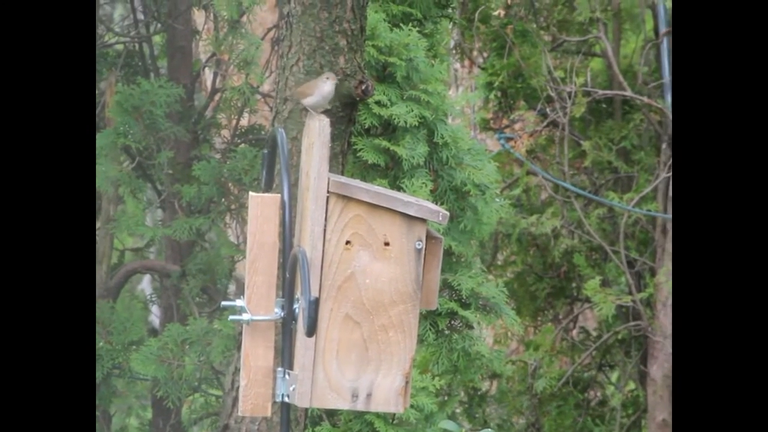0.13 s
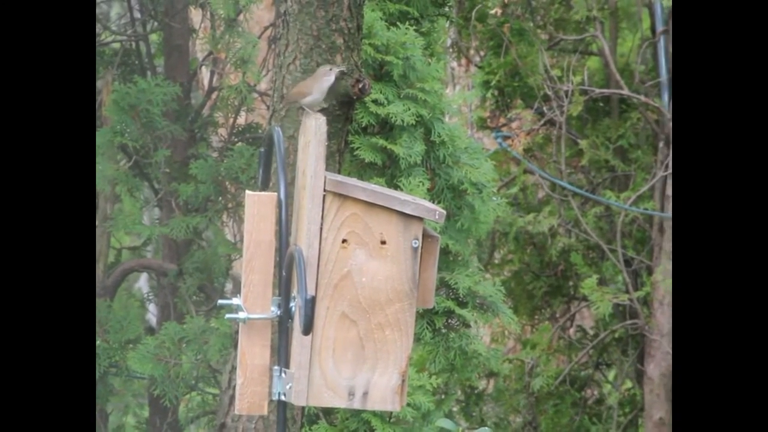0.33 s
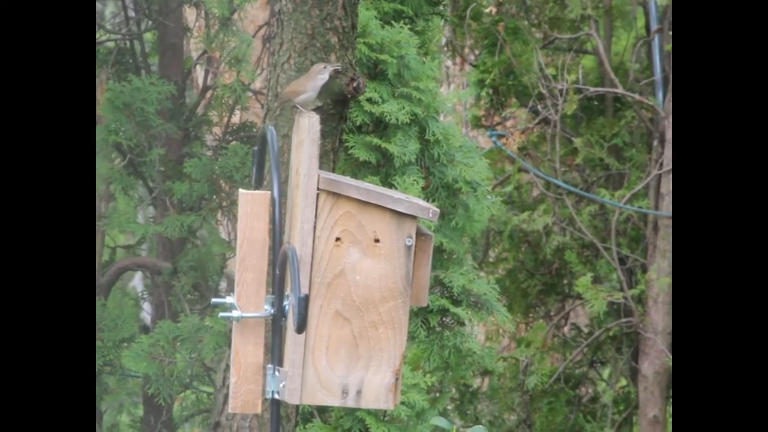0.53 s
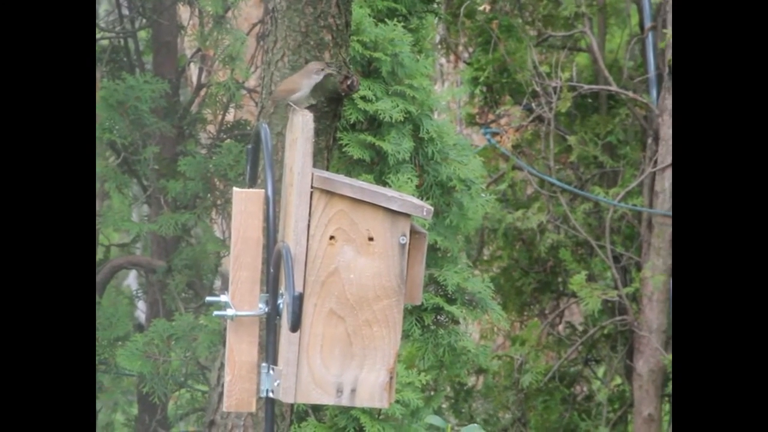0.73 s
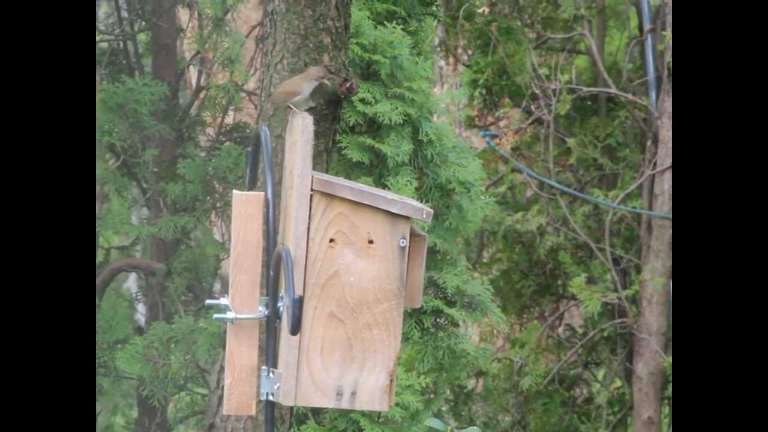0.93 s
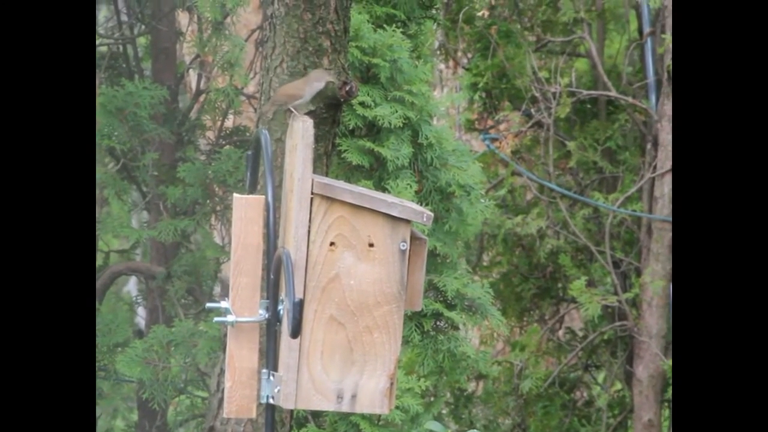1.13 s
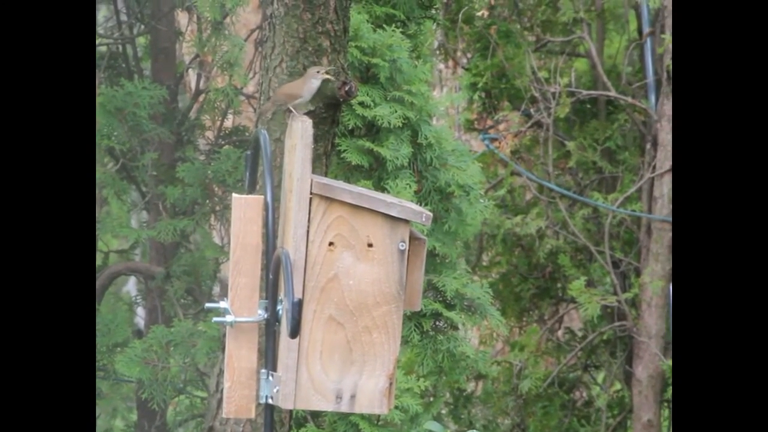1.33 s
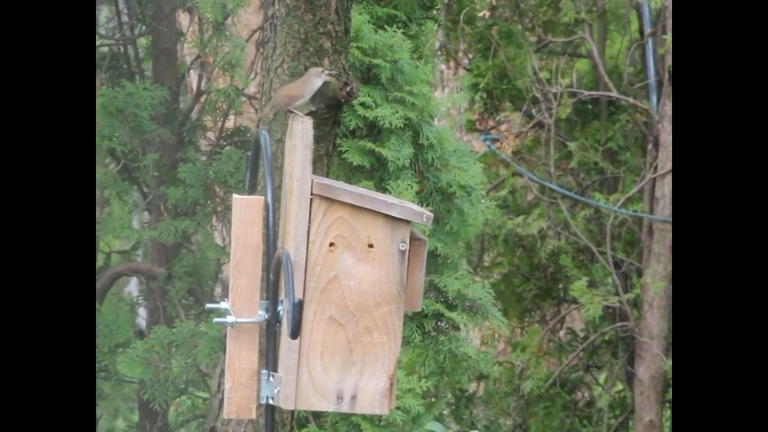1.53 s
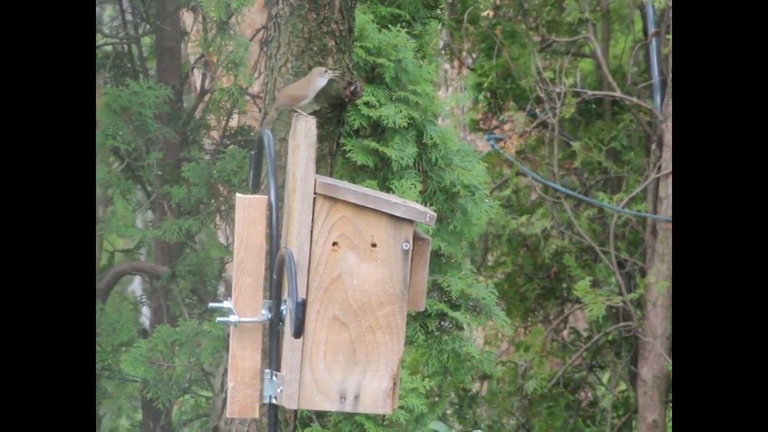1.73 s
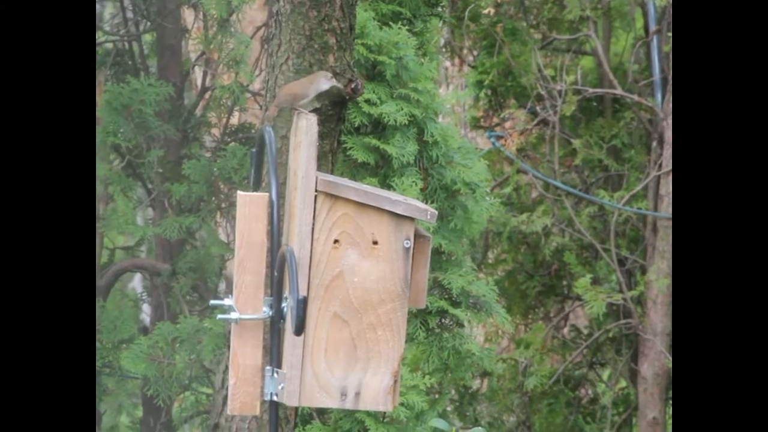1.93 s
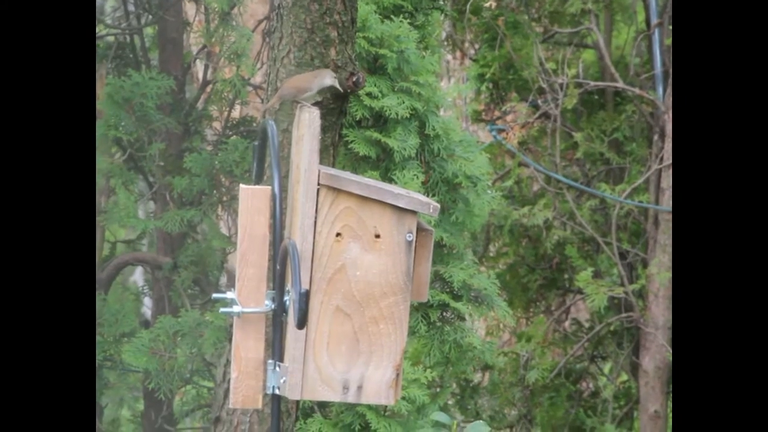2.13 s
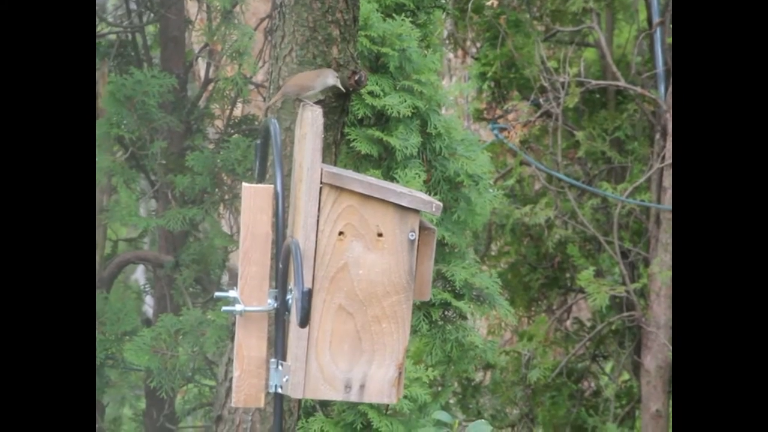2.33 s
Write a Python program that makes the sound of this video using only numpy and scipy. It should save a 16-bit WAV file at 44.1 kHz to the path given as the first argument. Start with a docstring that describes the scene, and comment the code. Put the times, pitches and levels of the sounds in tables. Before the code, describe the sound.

A wren sings one rapid song in a backyard, with a short echo. Soft scratchy chatter runs for the first 0.7 seconds, followed by four high gliding whistles until 1.3. A louder trill of four quick notes follows, then from 1.8 to 2.2 seconds three falling sweeps alternate with soft lower notes. A steady low hum and faint hiss lie underneath, with a slight rumble near 1.3 seconds.

```python
"""A wren sings one song in a backyard: scratchy chatter, high whistles, a trill of arches, then three
falling slurs between soft low notes. Each note is one gliding tone, roughened by flutter in the chatter.
Nearby walls throw the song back strongly and the trees add a diffuse tail.
Under it lie a steady outdoor hum and hiss, one brief low rumble and a faint electronic whine."""
import sys
import numpy as np
from scipy import signal
from scipy.fft import rfft, irfft
from scipy.io import wavfile
from scipy.ndimage import uniform_filter1d

SR = 44100
rng = np.random.default_rng(int(sys.argv[2]) if len(sys.argv) > 2 else 0)


def wrap_up_sound(samples):
    """Save the sound to the file named by the first command line argument, as 16-bit audio."""
    columns = np.atleast_2d(samples).T
    # keep every value between -1 and 1, then stretch to whole-number steps
    tamed = np.clip(columns, -1, 1)
    steps = np.round(tamed * 32767).astype(np.int16)
    wavfile.write(sys.argv[1], SR, steps)


N = 110250


def amp(db):
    """Decibels to gain."""
    return 10 ** (np.asarray(db) / 20)


def unit(x):
    """Scales to rms 1."""
    return x / np.sqrt(np.mean(x ** 2) + 1e-20)


def add(mix, start_s, sound):
    """Mixes a sound in at start_s."""
    part = mix[max(round(start_s * SR), 0):][:len(sound)]
    part += sound[:len(part)]


def phase_of(hz):
    """Integrates frequency to phase [rad]."""
    return 2 * np.pi * np.cumsum(hz) / SR


def noise(spectrum):
    """Noise of rms 1 with the given spectrum, rolled off at both ends."""
    knots_hz, db = np.transpose(spectrum)
    hz = np.fft.rfftfreq(N, 1 / SR) + 1
    gain = amp(np.interp(np.log(hz), np.log(knots_hz), db))
    rolloff = (1 + (hz / knots_hz[-1]) ** 20) * (1 + (knots_hz[0] / hz) ** 2)
    return unit(irfft(rfft(rng.standard_normal(N)) * gain / rolloff, N))


def wobble(rate_hz, n):
    """n samples of random wavering, rms about 1, low-passed at rate_hz."""
    hz = np.fft.rfftfreq(N, 1 / SR)
    return unit(irfft(rfft(rng.standard_normal(N)) * np.exp(-(hz / rate_hz) ** 2), N))[:n]


# hum spectrum (frequency [Hz], relative density [dB])
HUM_SPECTRUM = [(25, -1), (40, -11.5), (60, 0), (100, -3), (170, -1), (250, -3.5), (420, -7.5),
                (870, -14.5), (1250, -19), (1700, -26), (2200, -27)]
# hiss spectrum (frequency [Hz], relative density [dB])
HISS_SPECTRUM = [(800, -43), (1700, -7), (3500, 8), (5500, -5), (8000, -15.5), (12000, -15.5), (15700, -15)]


def outdoor_air(hum_db=-41, hiss_db=-54):
    """Steady low hum and faint hiss: two bands of noise."""
    return amp(hum_db) * noise(HUM_SPECTRUM) + amp(hiss_db) * noise(HISS_SPECTRUM)


# whine tones (frequency [Hz], rms level [dB])
WHINE_TONES = [(14874, -71), (15714, -76)]


def whine():
    """Thin electronic whine: two steady sines."""
    t = np.arange(N) / SR
    return sum(np.sqrt(2) * amp(db) * np.sin(2 * np.pi * hz * t) for hz, db in WHINE_TONES)


# scratchy notes (start [s], length [s], pitch [Hz], level [dB], relative overtone and hiss level [dB])
CHATTER_NOTES = [(.018, 0.028, 4030, -51, -34), (0.071, 0.024, 3750, -46.5, -31),
                 (0.118, .026, 3150, -47.5, 7), (0.201, 0.029, 3124, -47.5, 9),
                 (.262, 0.025, 3134, -39, -26), (0.362, 0.029, 3170, -46.5, 8.5),
                 (0.426, .022, 3080, -35.5, -34), (0.513, 0.066, 3260, -38, -36),
                 (.649, 0.0152, 3162, -34.5, -31), (0.702, 0.014, 3120, -33, -34)]
# hiss in those notes (frequency [Hz], relative density [dB])
SCRATCH_SPECTRUM = [(1500, -34), (2600, -25), (4400, -0.5), (5250, -11), (6150, 1.5), (7500, -2),
                    (8600, -17.5), (10000, -28), (11500, -44)]
WAVER_DEPTH, WAVER_RATE_HZ = 0.03, 298
FLUTTER_HZ, FLUTTER_RAD, FLUTTER_JITTER = 557, 0.78, 0.16
RASP_SPREAD, RASP_RATE_HZ = 0.079, 810


def chatter(fall=0.052):
    """Harsh, slightly falling notes: flutter adds side tones, jitter rasps; the bright ones also hiss."""
    out = np.zeros(N)
    for start_s, length_s, hz, db, overtone_db in CHATTER_NOTES:
        progress = np.arange(0, 1, 1 / (length_s * SR))
        n = len(progress)
        pitch_hz = hz * (1 + fall * (1 - 2 * progress))
        core_rad = phase_of(pitch_hz * (1 + WAVER_DEPTH * wobble(WAVER_RATE_HZ, n)))
        flutter = np.sin(phase_of(FLUTTER_HZ * (1 + FLUTTER_JITTER * wobble(WAVER_RATE_HZ, n))))
        rasp_rad = phase_of(hz * RASP_SPREAD * wobble(RASP_RATE_HZ, n))
        rough_rad = core_rad + FLUTTER_RAD * flutter + rasp_rad
        voice = np.sin(rough_rad) + 0.5 * np.sin(core_rad)
        overtones = amp(1) * np.sin(2 * core_rad) + amp(-23) * np.sin(rough_rad + 2 * core_rad)
        hiss = amp(-3) * noise(SCRATCH_SPECTRUM)[:n]
        envelope = amp(db) * np.sqrt(np.sin(np.pi * progress))
        add(out, start_s, envelope * (voice + amp(overtone_db) * (overtones + hiss)))
    return out


def scatter(envelope):
    """Dense random reflections under an envelope, energy 1."""
    return unit(rng.standard_normal(len(envelope)) * envelope) / np.sqrt(len(envelope))


# reflections from rough walls (delay [s], level [dB])
WALL_ECHOES = [(.0030, -11.5), (.0160, -5), (0.025, -11.5), (0.041, -7)]
EARLY_DB, EARLY_T60_S, EARLY_BUILD_S = -0.5, 0.28, 0.005
TAIL_DB, TAIL_T60_S, TAIL_BUILD_S = -4.5, 0.54, 0.018


def yard(song, direct_db=-8, smear_s=0.0012):
    """Direct sound, quick scatter from nearby things, a longer tail from trees, smeared wall echoes."""
    t = np.arange(SR) / SR
    impulse = signal.unit_impulse(SR)
    response = amp(direct_db) * impulse
    for db, t60_s, build_s in ((EARLY_DB, EARLY_T60_S, EARLY_BUILD_S),
                               (TAIL_DB, TAIL_T60_S, TAIL_BUILD_S)):
        build = 1 - np.exp(-(t / build_s) ** 2)
        decay = amp(-60 * t / t60_s)
        response += amp(db) * scatter(build * decay)
    for delay_s, db in WALL_ECHOES:
        add(response, delay_s, amp(db) * (impulse + 0.5 * scatter(np.exp(-t / smear_s))))
    return signal.fftconvolve(song, response)[:N]


def glide(times_s, hz, db, waver, edge_s=0.0034, second_db=-46, third_db=-48):
    """Wavering tone with faint harmonics along a pitch and level curve; returns (start_s, sound)."""
    t = np.arange(times_s[0], max(times_s[-1], times_s[0] + 0.01), 1 / SR)
    depth = np.interp(t, times_s, waver * np.ones(len(times_s)))
    smooth_hz = uniform_filter1d(np.interp(t, times_s, hz), size=130)
    jitter = np.sqrt(2) * np.tanh(wobble(WAVER_RATE_HZ, len(t)))
    phase = phase_of(smooth_hz * (1 + depth * jitter))
    tone = np.sin(phase) + amp(second_db) * np.sin(2 * phase) + amp(third_db) * np.sin(3 * phase)
    to_edge_s = np.minimum(t - t[0], t[-1] - t)
    fade = np.sin(np.pi / 2 * np.clip(to_edge_s / edge_s, 0, 1)) ** 2
    return times_s[0], np.sqrt(2) * fade * amp(np.interp(t, times_s, db)) * tone


# one curve per syllable (time [s], pitch [Hz], level [dB], waver depth [ratio])
WHISTLE_CURVES = [
    [(.744, 3930, -37, 0.14), (.753, 5040, -30.5, 0.17), (.760, 6136, -28.5, .025),
     (.767, 5810, -29, 0.051), (.792, 4760, -55, 0.066), (.819, 4103, -25, 0.046),
     (.838, 3810, -35.5, 0.026), (.858, 3200, -46, .04), (.875, 2776, -34.5, .06), (.884, 2520, -38, .06)],
    [(.916, 8030, -43, .04), (.926, 7194, -33, 0.053), (.938, 6950, -43.5, .03), (.960, 6020, -58, .03),
     (.972, 5510, -30, 0.047), (.984, 4810, -24, 0.034), (.994, 4755, -26, 0.026),
     (1.004, 4500, -48, 0.021)],
    [(1.033, 5970, -42, 0.058), (1.046, 7270, -32.5, 0.049), (1.056, 7830, -33.5, 0.013),
     (1.078, 7010, -57, 0.028), (1.095, 5730, -31.5, 0.016), (1.104, 5310, -25, 0.039),
     (1.111, 4490, -23.5, 0.03), (1.121, 4100, -31, 0.022)],
    [(1.163, 6090, -34, 0.13), (1.175, 7530, -26, 0.0097), (1.186, 7254, -40, 0.0092),
     (1.205, 6170, -53, 0.034), (1.231, 5174, -23, 0.041), (1.242, 4015, -30.5, 0.045),
     (1.260, 3905, -48, 0.021), (1.283, 3510, -26.5, 0.035), (1.299, 2991, -27.5, 0.015),
     (1.308, 2950, -44, .02)],
]
# second voice (time [s], pitch [Hz], level [dB])
UNDERTONE_CURVE = [(.808, 2240, -67), (.820, 2020, -53), (.842, 1855, -49.5)]


def whistles():
    """Four high gliding syllables; a soft second voice about an octave under the first one's fall."""
    out = np.zeros(N)
    for curve in WHISTLE_CURVES:
        add(out, *glide(*np.transpose(curve)))
    add(out, *glide(*np.transpose(UNDERTONE_CURVE), WAVER_DEPTH))
    return out


# rumble spectrum (frequency [Hz], relative density [dB])
RUMBLE_SPECTRUM = [(55, -7), (90, 5), (130, -17)]


def rumble(peak_s=1.28, width_s=0.065, peak_db=-47):
    """One brief swell of low noise."""
    t = np.arange(N) / SR
    swell = np.exp(-((t - peak_s) / width_s) ** 2)
    return amp(peak_db) * swell * noise(RUMBLE_SPECTRUM)


def repeat_glide(shape, repeats):
    """Repeats a note shape, stretched in time and scaled in pitch about its final pitch."""
    out = np.zeros(N)
    times_s, hz, db, waver = np.transpose(shape)
    for start_s, level_db, stretch, span in repeats:
        pitch_hz = hz[-1] + (hz - hz[-1]) * span
        add(out, *glide(start_s + times_s * stretch, pitch_hz, db + level_db, waver))
    return out


# base arch (time [s], pitch [Hz], relative level [dB], waver depth [ratio])
ARCH_SHAPE = [(0, 3806, -1, 0.032), (.011, 4080, -5.5, 0.024), (.021, 4656, 2.5, 0.037),
              (.028, 5594, -2, 0.018), (.037, 5550, -4.5, .012), (.052, 4500, -15.5, 0.04776),
              (.066, 3600, -3, .04), (.080, 3100, -6, 0.023), (.093, 2920, -8, 0.016)]
# arches (start [s], level [dB], stretch [ratio], pitch span [ratio])
ARCH_REPEATS = [(1.323, -22.5, 1.02, 1.0), (1.433, -23, 0.97, 1.01), (1.542, -23, 1.02, .99),
                (1.652, -24, 1.15, 0.92)]


def trill():
    """Four quick arches, each rising then falling in pitch."""
    return repeat_glide(ARCH_SHAPE, ARCH_REPEATS)


# base low note (time [s], pitch [Hz], relative level [dB], waver depth [ratio])
LOW_NOTE_SHAPE = [(0, 2670, -19, 0.049), (.012, 2408, 2, 0.044), (.024, 2362, -5.5, .04),
                  (.035, 2094, -5.5, 0.045)]
# low notes (start [s], level [dB], stretch [ratio], pitch span [ratio])
LOW_NOTE_REPEATS = [(1.774, -32, 0.6, 1.6), (1.908, -36, 1.0, 0.93), (2.040, -39, 1.046, 0.96),
                    (2.159, -36.5, 0.7, 0.97)]


def low_notes():
    """Four soft falling notes that alternate with the slurs."""
    return repeat_glide(LOW_NOTE_SHAPE, LOW_NOTE_REPEATS)


# base slur (time [s], pitch [Hz], relative level [dB], waver depth [ratio])
SLUR_SHAPE = [(0, 4673, -7, .015), (.008, 4164, -4.5, 0.016), (.016, 3586, -1.5, 0.038),
              (.024, 3150, -4.5, .015), (.033, 2840, -7.5, 0.014)]
# slurs (start [s], level [dB], stretch [ratio], pitch span [ratio])
SLUR_REPEATS = [(1.847, -20.5, 1.01, 1.03), (1.973, -21, 1.2, 0.95), (2.101, -22, 1.2, 1.03)]


def slurs():
    """Three fast downward sweeps near the song's end."""
    return repeat_glide(SLUR_SHAPE, SLUR_REPEATS)


def scene():
    """The wren in the yard over hum, hiss and rumble; mono."""
    song = chatter() + whistles() + trill() + low_notes() + slurs()
    return (outdoor_air() + yard(song) + rumble())[None]


def record(dry):
    """The recorder adds its whine and limits the band."""
    cutoff_hz = 15800
    lowpass = signal.firwin(1023, cutoff_hz, window=("kaiser", 9), fs=SR)
    return signal.oaconvolve(dry + whine(), lowpass[None], "same")


dry = scene()
out = record(dry)
wrap_up_sound(out)
```